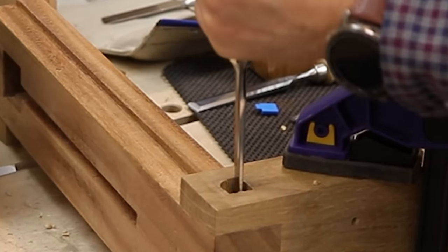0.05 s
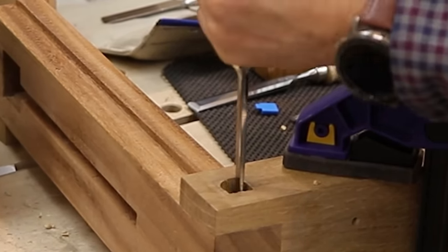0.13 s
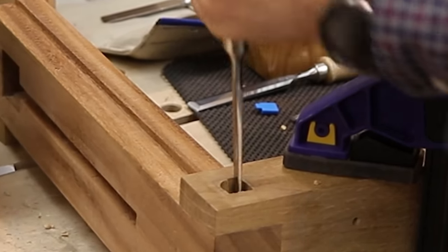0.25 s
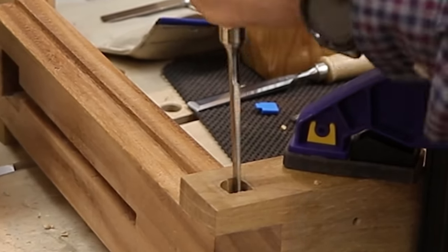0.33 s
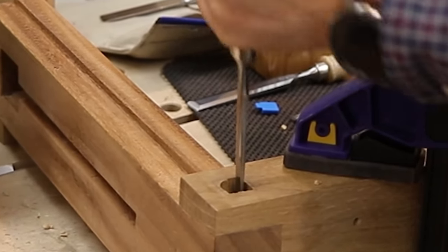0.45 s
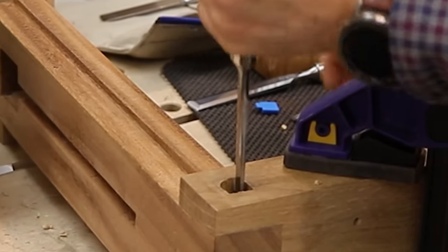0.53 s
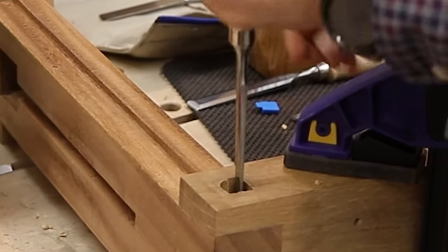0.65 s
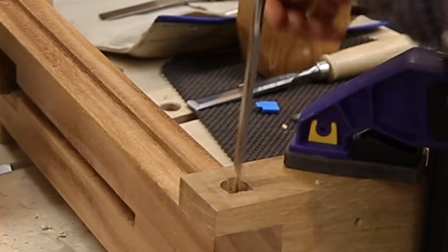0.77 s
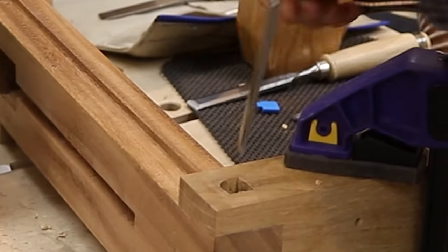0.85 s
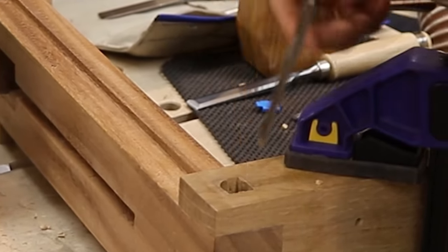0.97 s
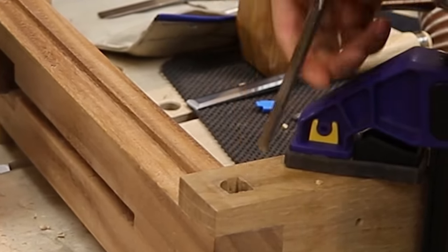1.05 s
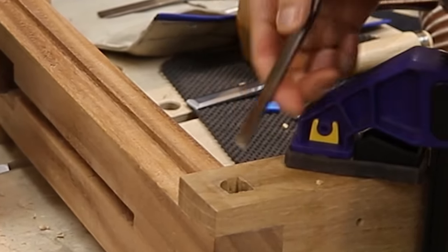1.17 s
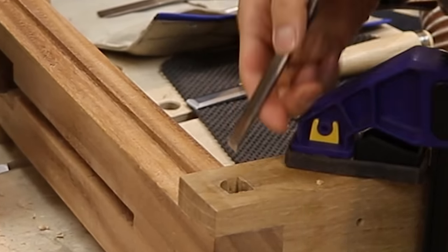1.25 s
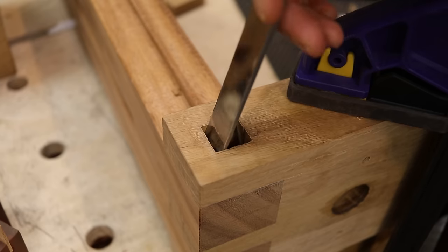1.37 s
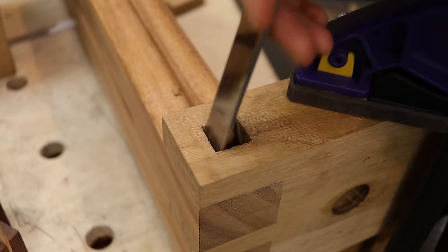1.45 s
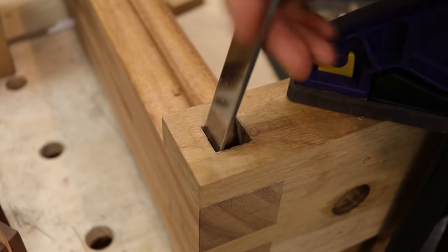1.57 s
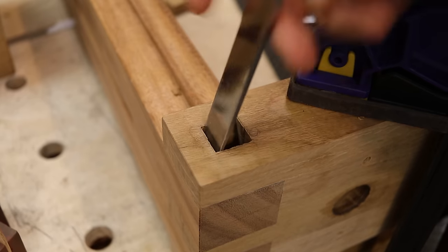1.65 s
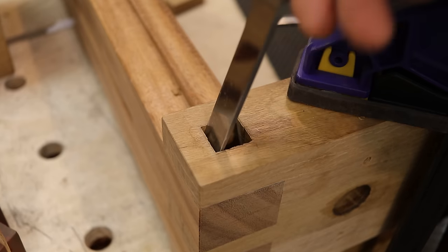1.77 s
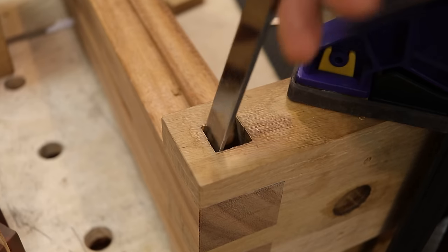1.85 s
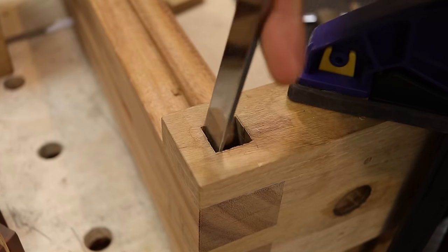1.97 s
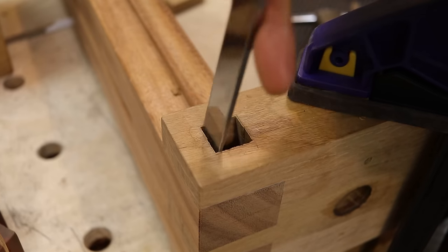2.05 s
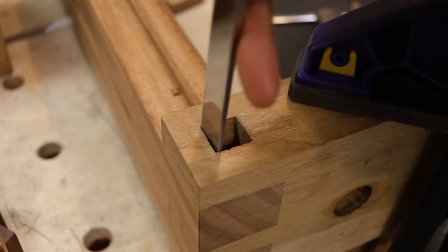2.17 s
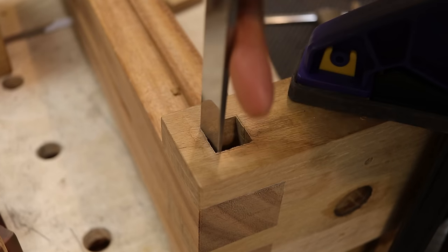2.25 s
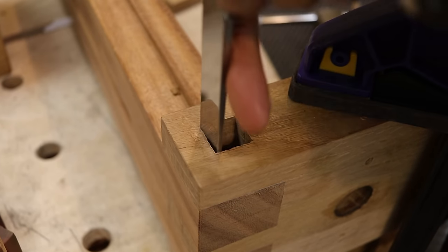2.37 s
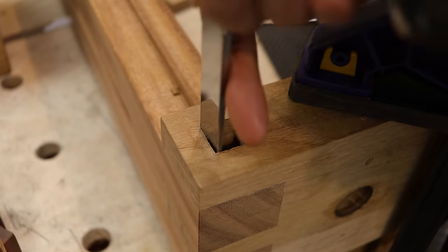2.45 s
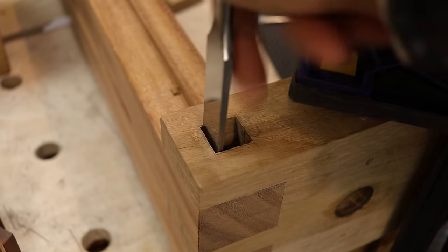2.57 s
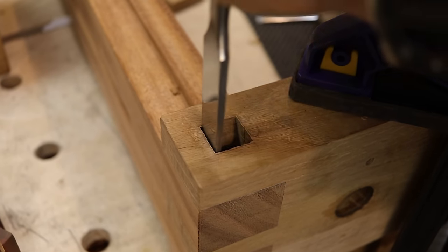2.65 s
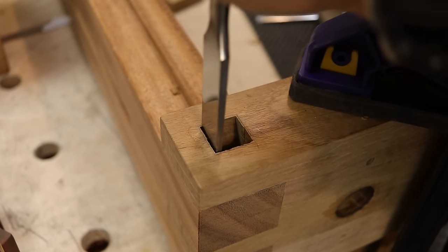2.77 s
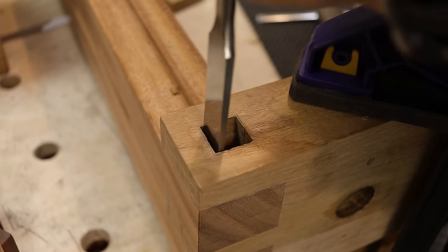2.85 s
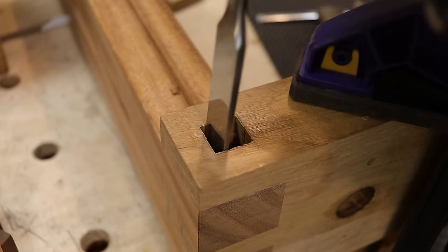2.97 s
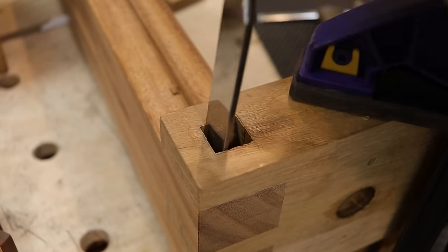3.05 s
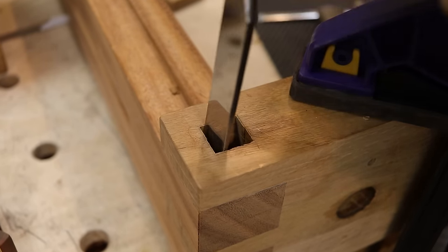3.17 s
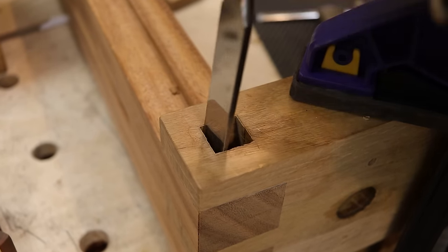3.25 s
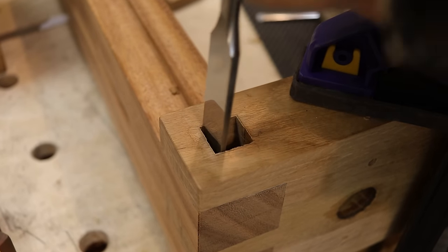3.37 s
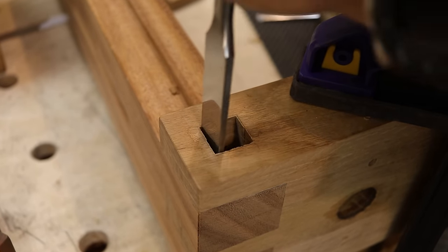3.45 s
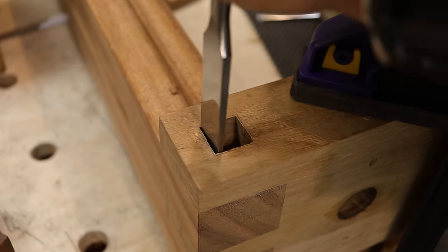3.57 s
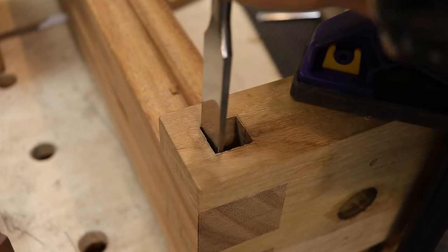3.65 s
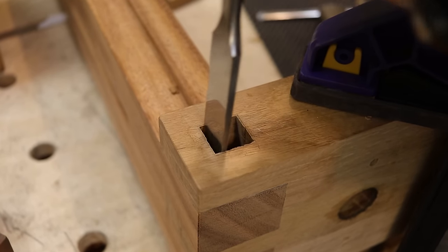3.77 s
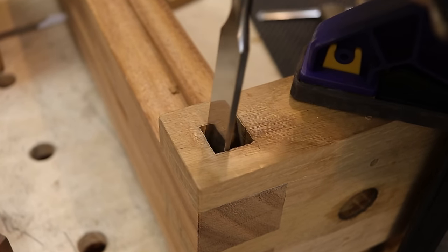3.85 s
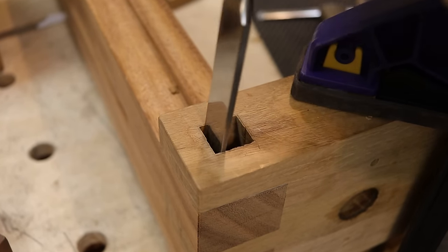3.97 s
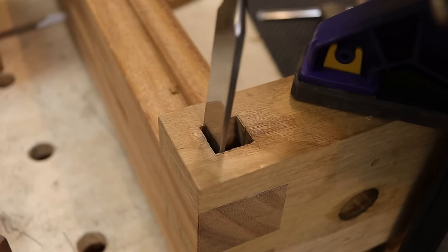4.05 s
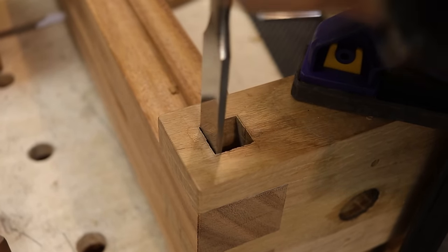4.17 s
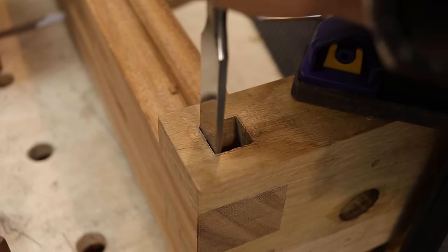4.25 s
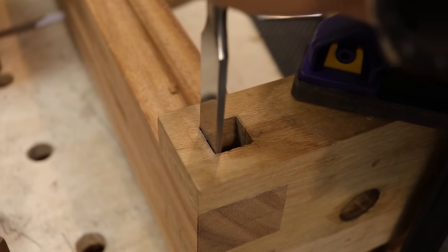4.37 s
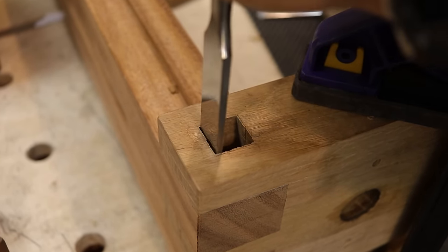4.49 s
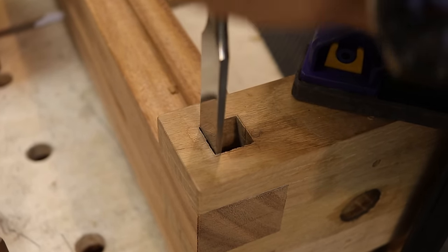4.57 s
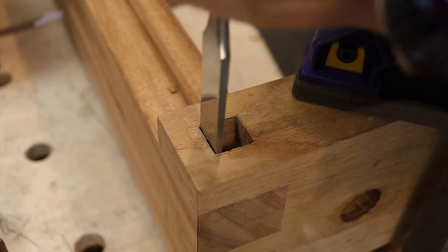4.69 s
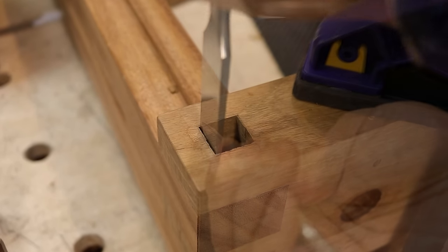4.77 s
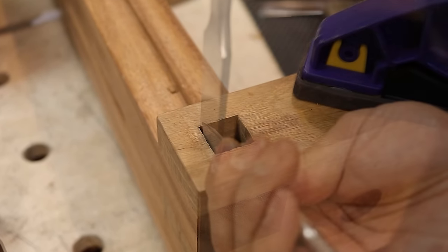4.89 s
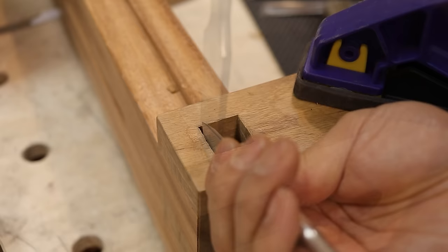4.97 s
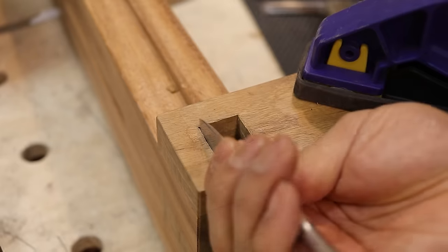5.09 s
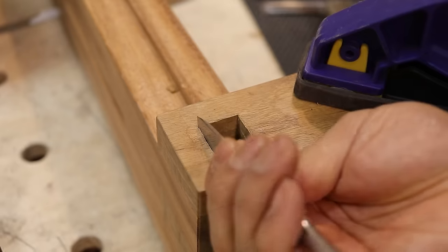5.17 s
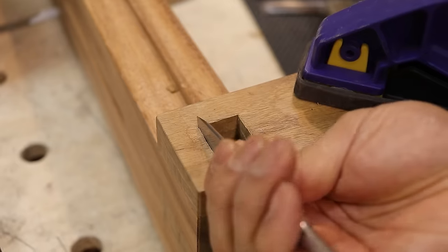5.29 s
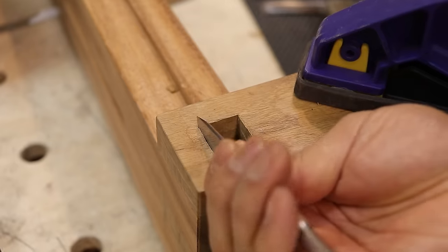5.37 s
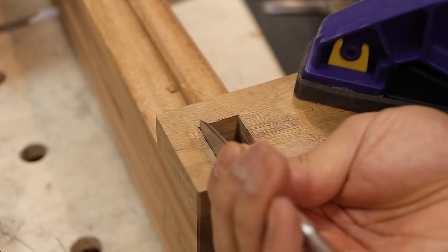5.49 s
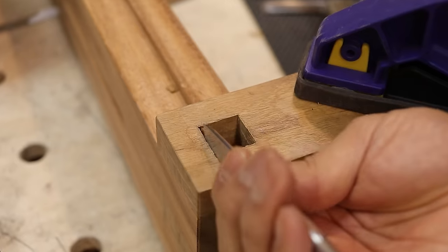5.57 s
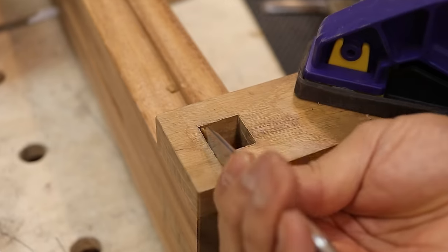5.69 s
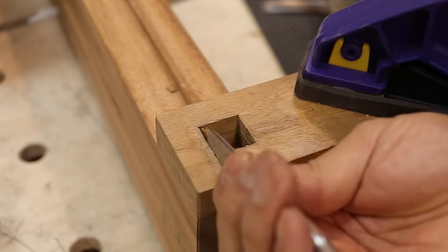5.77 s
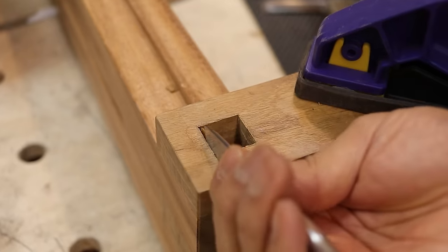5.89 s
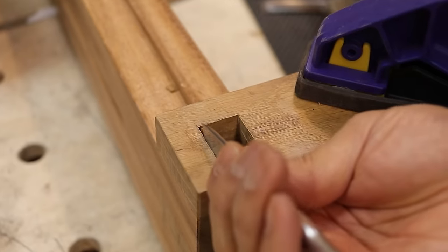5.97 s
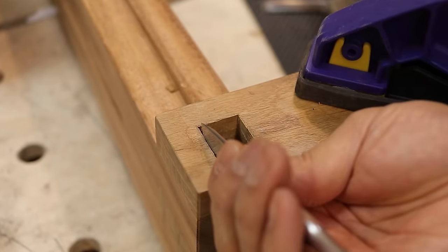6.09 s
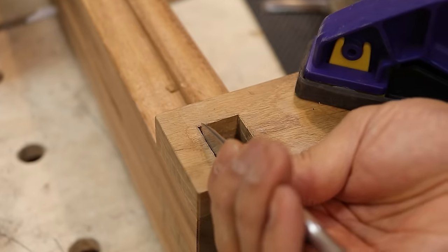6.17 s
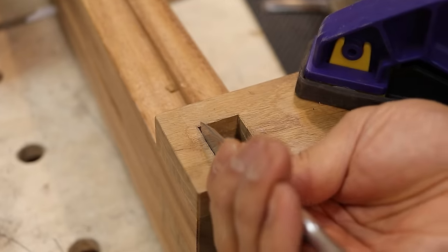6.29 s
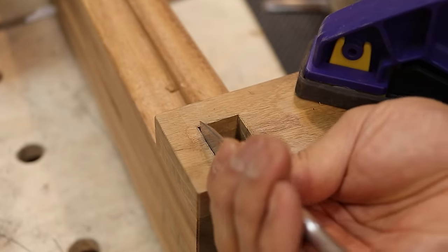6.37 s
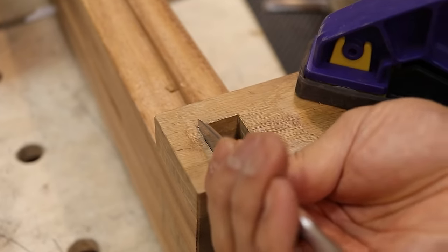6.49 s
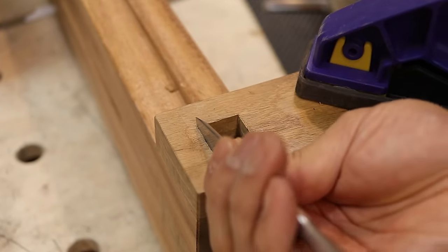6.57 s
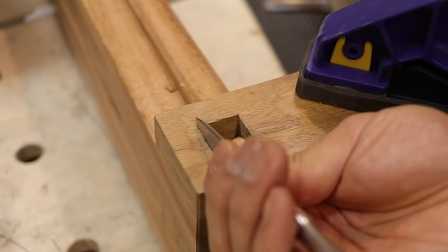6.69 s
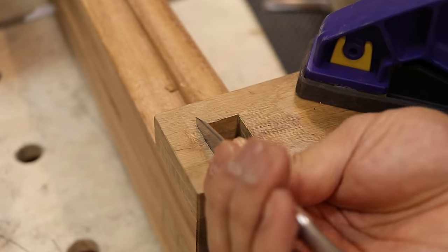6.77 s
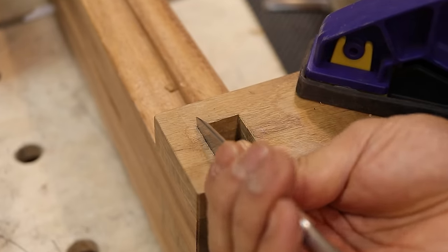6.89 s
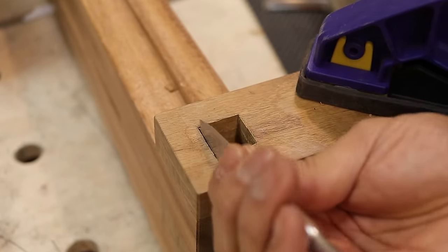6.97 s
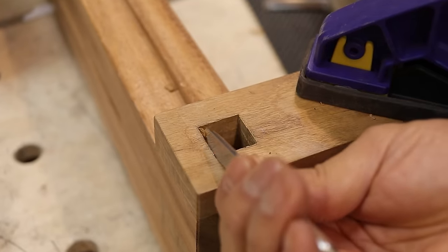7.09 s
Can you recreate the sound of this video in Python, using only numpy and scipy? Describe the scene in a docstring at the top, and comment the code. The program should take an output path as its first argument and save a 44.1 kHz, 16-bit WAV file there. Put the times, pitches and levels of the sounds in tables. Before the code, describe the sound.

In a small quiet workshop, a steel file bumps dully against a clamped oak block and rubs faintly out of its hole. After a slight step up in background hiss, a chisel is set down with a woody tap and pushed in short, dense crackles of torn fibre ending in hollow knocks. Fibres snap, a sleeve rustles near the close microphone, and light paring scrapes finish.

```python
"""A small workshop: a file bumps softly and is drawn out of a hole in a clamped oak block, then a chisel squares the corners.
Each push is a dense crackle of torn fibres, shaped by wood and blade; it ends in a knock of ringing modes that rocks the bench.
Among and after the pushes the chisel pares with its blade held flat; taps, snapping fibres and a squeak come from the hole.
A sleeve rustles in soft grains close to the microphone, over room air, hiss and low flicker noise."""
import sys
import numpy as np
from scipy import signal
from scipy.fft import rfft, irfft, next_fast_len
from scipy.io import wavfile
from scipy.ndimage import uniform_filter1d

SR = 44100
rng = np.random.default_rng(int(sys.argv[2]) if len(sys.argv) > 2 else 0)


def to_wav(sig):
    """Store sig (one row per channel, or 1-D mono) as 16-bit WAV at the path in sys.argv[1].

    Samples outside -1..1 are clipped; the rate is SR.
    """
    pcm = np.clip(np.atleast_2d(sig), -1, 1) * 32767
    pcm = np.round(pcm).astype(np.int16)
    wavfile.write(sys.argv[1], SR, pcm.T)  # frames by channels


N = 314874
TIME = np.arange(N) / SR
GRID = np.fft.rfftfreq(8192, 1 / SR) + 1  # Hz, lifted by 1 to allow logarithms

# the upright blade cuts down and stops with a knock:
# [stop_s, length_s, level_db, tilt_db_per_octave, spikiness_db, blade_ring_hz, knock_db, contact_cutoff_hz]
UPRIGHT_PUSHES = [(2.341, .028, -47.5, -.8, -1, 5900, -45.5, 450),
                  (2.424, 0.051, -43.5, -1.4, -4.5, 1370, -39, 503),
                  (2.548, .047, -36.5, -2.2, 3, 1700, -38, 480),
                  (2.674, .036, -34, -0.2, 5, 1930, -21, 570),
                  (3.509, .058, -29.5, 0.5, 6, 10800, -25, 460),
                  (3.727, .012, -44, -1.5, 9, 5400, -58.5, 336), (4.307, .015, -27, -1, -5, 5040, -23, 473),
                  (4.701, 0.02, -42, -1.3, 10, 2430, -41.5, 280)]
# paring with the blade held flat: [stop_s, length_s, level_db, tilt_db_per_octave, spikiness_db, blade_ring_hz]
FLAT_PARES = [(3.225, .17, -50.5, -6, 5.8, 1550), (3.308, .03, -59, 1.5, 5.5, 3200),
              (3.973, .075, -51, -7.5, 3.6, 246), (4.072, 0.073, -45, 0.1, 8.7, 7300),
              (5.266, .066, -32.5, .2, 4.6, 240), (5.58, 0.035, -57, -2.5, 4, 259),
              (5.73, 0.084, -57, -2, 5.4, 250), (6.16, 0.061, -61.5, -0.5, 3.8, 540),
              (6.302, 0.035, -60, -3, 5.4, 1750), (6.44, 0.097, -49.5, -2, 5.8, 225),
              (6.548, .068, -50, -1.85, 4, 1770), (6.699, .114, -38, -.3, 4.8, 1850)]
# what an upright blade in the hole rings with: [mode_hz, width_hz, relative_db]
UPRIGHT_MODES = [(211, 120, 5.5), (378, 100, 2.5), (566, 305, 1.5), (808, 240, -0.5), (1232, 183, 0.5),
                 (1713, 380, -2.5), (2210, 540, -10), (2600, 1100, -28), (3250, 1400, -7),
                 (3800, 1600, -13), (2120, 140, -8.5), (3020, 77, 3), (5180, 1500, -12), (6020, 1050, -12),
                 (7980, 2030, -12.5), (11000, 2300, -13), (14200, 3500, -21.5)]


def amp(db):
    """Decibels to gain."""
    return 10 ** (np.asarray(db) / 20)


def unit(x):
    """Scale to rms 1."""
    return x / np.sqrt(np.mean(x ** 2) + 1e-20)


def along(points, hz):
    """Read a curve of (Hz, value) points on a log frequency axis."""
    point_hz, values = np.transpose(points)
    return np.interp(np.log(hz + 1), np.log(point_hz + 1), values)


def bump(hz, octaves):
    """A bell on the log-frequency axis."""
    return np.exp(-.5 * (np.log2(GRID / hz) / octaves) ** 2)


def coloured(x, gain):
    """Causal minimum-phase filter with the given gain shape; white noise keeps its power."""
    cepstrum = irfft(np.log(np.maximum(gain / gain.max(), 1e-5)))
    half = len(cepstrum) // 2
    # folding the cepstrum forward makes the filter causal
    cepstrum[1:half] *= 2
    cepstrum[half + 1:] = 0
    kernel = irfft(np.exp(rfft(cepstrum)))[:half]
    return signal.fftconvolve(x, kernel / np.linalg.norm(kernel))


def add(track, s, x):
    """Mix x into the track at time s."""
    part = track[max(round(s * SR), 0):][:len(x)]
    part += x[:len(part)]


def burst(db, colour, t60):
    """A short contact noise that starts at once and dies away."""
    t = np.arange(SR // 4) / SR
    return coloured(rng.standard_normal(len(t)) * amp(db - 60 * t / t60), colour)


def crackle(size, spiky_db, rate, snap_s):
    """Fibres break rate times a second; each is a burst of random size that starts at once and dies away."""
    lead = SR // 50  # earlier snaps are still dying away at the start
    strength = amp(spiky_db * np.clip(rng.standard_normal(size + lead), -2, 2))
    snaps = (rng.random(size + lead) < rate / SR) * strength
    power = signal.lfilter([1], [1, -np.exp(-1 / (snap_s * SR))], snaps ** 2)[lead:]
    return unit(np.sqrt(power) * rng.standard_normal(size))


def strokes(table, modes, bite_db, rise_share, fade_db, ring_db, fibre_rate):
    """The edge bites, runs through the fibres and stops dead; wood and blade colour the crackle."""
    out = np.zeros(N)
    mode_gains = [amp(db) / (1 + (2 * (GRID - hz) / width) ** 2) for hz, width, db in modes]
    body = np.sqrt(sum(gain ** 2 for gain in mode_gains))
    for stop, length, db, tilt, spiky_db, ring_hz, *_ in table:
        progress = np.linspace(0, 1, int(length * SR))
        force = amp(db + np.interp(progress, [0, rise_share, 1], [-bite_db, 0, -fade_db]))
        colour = body * amp(tilt * np.log2(GRID) + ring_db * bump(ring_hz, octaves=0.12))
        fibres = crackle(len(force), spiky_db, fibre_rate, snap_s=0.00078)
        add(out, stop - length, coloured(force * fibres, colour))
    return out


def pushes():
    """The upright blade tears down through the oak, its crackle strengthening towards the stop."""
    return strokes(UPRIGHT_PUSHES, UPRIGHT_MODES, bite_db=14, rise_share=0.61, fade_db=-0.5,
                   ring_db=9.5, fibre_rate=2500)


def pares():
    """The blade held flat pares in strokes that rise early and then ease off."""
    # what a paring stroke rings with: [mode_hz, width_hz, relative_db]
    flat_modes = [(213, 88, 2.5), (376, 48, -5), (523, 98, -3.5), (806, 130, -9.5), (1021, 39, -6),
                  (1220, 300, -11), (1713, 167, -4.5), (2020, 520, -18.5), (3040, 210, -10.5),
                  (3224, 42, -7), (3490, 270, -14.5), (3900, 280, -21), (4760, 460, -16),
                  (5440, 540, -18.5), (6130, 630, -17.5), (8100, 3400, -29.5), (9200, 3200, -25)]
    return strokes(FLAT_PARES, flat_modes, bite_db=12, rise_share=.28, fade_db=4.5,
                   ring_db=5.5, fibre_rate=3000)


def slides():
    """The blade slides along the wall of the hole without cutting."""
    # [stop_s, length_s, level_db, tilt_db_per_octave, spikiness_db, blade_ring_hz]
    wall_slides = [(1.875, 0.11, -55.5, -2, -2, 3900), (2.097, 0.062, -55, -0.5, 3, 5370),
                   (3.05, .16, -59.5, 1, 7, 9200), (3.45, .125, -50, 0, 13, 3700),
                   (3.79, 0.072, -58, 6.5, -2, 6960), (4.207, 0.023, -55.5, -1.5, 4, 4600),
                   (4.29, 0.063, -46.5, -2.5, -2, 4630), (4.742, 0.052, -55, 2, -5, 13000)]
    return strokes(wall_slides, UPRIGHT_MODES, bite_db=8, rise_share=0.42, fade_db=4.5,
                   ring_db=6, fibre_rate=3000)


def file_rubs():
    """The file rubs the rim on its way out of the hole."""
    # [stop_s, length_s, level_db, tilt_db_per_octave, spikiness_db, file_ring_hz]
    rim_rubs = [(.735, 0.032, -67.5, 8, 4.4, 3250), (.92, .094, -60, 0, 6.5, 895)]
    # file in the hole: [mode_hz, width_hz, relative_db]
    file_modes = [(269, 72, 8), (910, 410, -4.5), (2600, 2100, -13), (3340, 610, -7.5)]
    return strokes(rim_rubs, file_modes, bite_db=6, rise_share=0.13, fade_db=8.5,
                   ring_db=1.5, fibre_rate=1500)


def squeak(jitter, overtone_db, stutter_db):
    """The edge sticks and slips once on the wall of the hole: a faint, stuttering tone with two overtones."""
    start_s, length_s, pitch_hz, level_db = 3.09, 0.16, 1554, -59
    out, size = np.zeros(N), int(length_s * SR)
    waver = unit(uniform_filter1d(rng.standard_normal(size), size=100))
    phase = 2 * np.pi * np.cumsum(pitch_hz * (1 + jitter * waver)) / SR
    tone = unit(sum(amp(overtone_db * k) * np.sin((k + 1) * phase) for k in np.arange(3)))
    grip = amp(stutter_db * unit(uniform_filter1d(rng.standard_normal(size), size=500)))
    add(out, start_s, amp(level_db) * np.hanning(size) ** .5 * unit(grip * tone))
    return out


def damped(x, edge_hz):
    """Oak swallows the top of the treble."""
    return signal.sosfilt(signal.butter(4, edge_hz, fs=SR, output="sos"), x)


def contacts():
    """Every cut ends in a knock, and tools bump the block: (s, level dB, contact cut-off Hz, blade ring dB)."""
    # a tool is set against the block: [start_s, level_db, contact_cutoff_hz, blade_ring_db]
    bumps = [(.184, -42, 175, -55), (.212, -30.5, 74.4, -65), (.494, -49, 81.5, -63), (.828, -59, 497, -11),
             (1.602, -28.5, 1050, 1.5)]
    cut_blade_db = -33  # a blade buried in wood hardly rings
    pushed = [(stop, knock_db, contact_hz, cut_blade_db)
              for stop, *_, knock_db, contact_hz in UPRIGHT_PUSHES]
    # a stroke at hard_db knocks at -23 dB; each dB lighter loses 2.97 dB of knock
    hard_db, hard_knock_db, knock_growth, pare_contact_hz = -33, -23, 2.97, 620
    pared = [(stop, hard_knock_db + knock_growth * (db - hard_db), pare_contact_hz, cut_blade_db)
             for stop, _, db, *_ in FLAT_PARES]
    return bumps + pushed + pared


def ring(modes, t, scatter_db):
    """Damped modes, at slightly new strengths for every blow."""
    hz, db, t60 = np.transpose(modes)[:, :, None]
    sign = rng.choice([-1, 1], hz.shape)
    level = amp(db + scatter_db * rng.standard_normal(hz.shape) - 60 * t / t60)
    return np.sum(sign * level * np.sin(2 * np.pi * hz * t), axis=0)


def knocks():
    """Tools strike the oak: soft contacts leave out the high modes, brief ones hardly move the low modes."""
    # oak and bench: [mode_hz, relative_db, t60_s]
    block_modes = [(146.6, 2.5, 0.24), (176.7, 0, 0.31), (196.2, 2, 0.17), (237.1, -0.5, 0.28),
                   (346.7, -3, 0.12), (383, -6, 0.12), (456, -8.5, 0.136), (532, -2, 0.14), (702, -1, 0.1),
                   (804, -7.5, 0.23), (994, -21, 0.14), (1030, -2, 0.13), (1275, -28, .12),
                   (1730, -56, 0.14)]
    # the steel blade: [mode_hz, relative_db, t60_s]
    blade_modes = [(2183, 8, 0.017), (2300, -8, 0.16), (5540, -7.5, 0.016)]
    clack_contact_hz = 814  # softer contacts than this hardly wake the hole's hollow clack
    out, t = np.zeros(N), np.arange(SR // 2) / SR
    for s, db, contact_hz, blade_db in contacts():
        bass_hz = 0.19 * contact_hz
        struck = []
        for hz, level, t60 in block_modes:
            loss_db = 10 * np.log10(1 + (hz / contact_hz) ** 4 + (bass_hz / hz) ** 4)
            struck.append((hz, level - loss_db, t60))
        wood = ring(struck, t, scatter_db=1.5)
        steel = ring(blade_modes, t, scatter_db=1)
        # the many heavily damped modes of the bench merge into a short thud
        contact = (1 + (GRID / contact_hz) ** 4 + (bass_hz / GRID) ** 4) ** -.5
        colour = contact * GRID / (GRID + 120)
        thud = coloured(rng.standard_normal(len(t)) * amp(-60 * t / 0.081), colour)[:len(t)]
        add(out, s, amp(db - 9.5) * (wood + amp(-3.5) * thud + amp(blade_db) * steel))
        softness_db = 10 * np.log10(1 + (clack_contact_hz / contact_hz) ** 6)
        add(out, s, burst(db + 1 - softness_db, bump(hz=519, octaves=0.29), t60=0.063))
    return out


def taps():
    """The tools tap the wood, from a dull thump to a sharp tick on the hole's edge."""
    # [start_s, level_db, centre_hz, width_octaves, t60_s]
    tool_taps = [(0.211, -42, 129.5, 0.2, 0.25), (1.259, -56.5, 910, 0.58, 0.062),
                 (1.603, -40, 1080, .12, 0.12), (2.626, -47.5, 1600, 1.1, 0.02),
                 (2.671, -22, 1640, 0.69, 0.018), (2.815, -54, 1490, 0.39, 0.037),
                 (2.868, -33.5, 790, .65, 0.015), (2.922, -44.5, 1180, 0.78, 0.023),
                 (3.615, -39, 2300, 0.15, 0.011), (4.012, -34.5, 1520, 0.31, 0.032),
                 (4.029, -46, 1650, 0.29, 0.019), (4.684, -54, 2440, 0.072, .05),
                 (4.692, -43, 1200, 0.38, 0.044), (5.266, -32, 970, 0.46, 0.073)]
    out = np.zeros(N)
    for s, db, hz, octaves, t60 in tool_taps:
        add(out, s, burst(db, bump(hz, octaves), t60))
    return out


def snaps():
    """Single fibres snap under the loaded edge, each a very short bright burst."""
    # [start_s, level_db]
    fibre_snaps = [(3.222, -50), (3.377, -51), (3.427, -39), (3.435, -45), (3.452, -42), (3.476, -26),
                   (3.548, -42), (4.2217, -30.5), (4.2506, -31), (4.298, -24)]
    # spectrum of one snap: [frequency_hz, relative_db_per_hz]
    snap_colour = [(500, -7), (1700, -2), (2600, -13), (3900, 5), (5500, 3), (9000, -10), (15000, -21)]
    out = np.zeros(N)
    for s, db in fibre_snaps:
        add(out, s, burst(db, amp(along(snap_colour, GRID)), t60=0.0072))
    return out


def bench():
    """Each push rocks the heavy bench twice: as the hand leans in and just after the blade stops."""
    sway_hz, sway_cycles = 43, 0.26
    lean_lead_s, lean_db, rock_lag_s = 0.0293, -7.5, 0.0031
    out, t = np.zeros(N), np.arange(-SR // 10, SR // 10) / SR
    sway = np.sin(2 * np.pi * sway_hz * t) * np.exp(-(sway_hz * t / sway_cycles) ** 2)
    for stop, *_, knock_db, _ in UPRIGHT_PUSHES:
        db = -6 + 0.49 * knock_db  # the sway grows more slowly than the knock
        add(out, stop - lean_lead_s + t[0], amp(db + lean_db) * sway)
        add(out, stop + rock_lag_s + t[0], amp(db) * sway)
    return out


def rustle(curve, gain_db):
    """Cloth and skin rub in fine soft grains as the arm moves."""
    # spectrum of the rubbing: [frequency_hz, relative_db_per_hz]
    cloth = [(24, -44), (40, 8), (202, -8), (239, -3.5), (277, -6), (391, -6), (431, -1.5), (512, -8.5),
             (1210, -10), (14000, -34)]
    level_db = np.interp(TIME, *np.transpose(curve), left=-120, right=-120)
    grains = crackle(N, spiky_db=2.5, rate=1500, snap_s=.003)
    return amp(level_db + gain_db) * coloured(grains, amp(along(cloth, GRID)))[:N]


def sleeve():
    """The sleeve rustles close to the microphone, rising and falling with the arm."""
    # level before the gain: [time_s, level_db]
    sleeve_curve = [(1.4, -66.5), (1.71, -63), (2.07, -60), (2.23, -52.5), (2.44, -58.5), (3.2, -59.5),
                    (3.58, -55.5), (3.8, -60.5), (4.1, -69.5), (4.39, -63), (5.02, -69), (5.15, -71.5),
                    (5.43, -62.5), (5.85, -83)]
    return rustle(sleeve_curve, gain_db=1.5)


def hands():
    """Fingers rub softly on the file at the start."""
    # level before the gain: [time_s, level_db]
    hand_curve = [(0.0, -67), (0.7, -74.5), (0.868, -71), (1.006, -64.5), (1.29, -70), (1.4, -73)]
    return rustle(hand_curve, gain_db=-2)


def room(x, wet_db):
    """The shop's short reverberation: decaying noise, drawn anew for every half second of sound."""
    # decay of the shop: [frequency_hz, t60_s]
    decay = [(150, 0.51), (600, 0.33), (3000, 0.18), (12000, 0.14)]
    out, size = np.zeros(N), SR // 2
    for start in range(0, N, size):
        hz, t, z = signal.stft(rng.standard_normal(size), SR, nperseg=256)
        fading = z * amp(-60 * t / along(decay, hz)[:, None])
        tail = signal.istft(fading, SR, nperseg=256)[1]
        tail *= 1 - np.exp(-np.arange(len(tail)) / SR / 0.0019)  # reflections build up
        kernel = unit(tail) / np.sqrt(len(tail))
        add(out, start / SR, signal.fftconvolve(x[start:start + size], kernel))
    return x + amp(wet_db) * out


def floor(air_db, hiss_db, flicker_db, early_db):
    """Still room air in the middle, hiss and low flicker noise in each channel; all step up at 1.415 s."""
    # spectrum of the room air: [frequency_hz, relative_db_per_hz]
    air_colour = [(15, -50.5), (25, -1.5), (75, -5), (119, -1), (297, -6), (410, -10), (648, -10.5),
                  (1080, -14), (1410, -16), (2300, -15.5), (15500, -30)]
    step_s = 1.415
    air = coloured(rng.standard_normal(N), amp(along(air_colour, GRID)))[:N]
    flicker = np.array([coloured(noise, (GRID + 30) ** -.5)[:N] for noise in rng.standard_normal((2, N))])
    electronic = amp(hiss_db) * rng.standard_normal((2, N)) + amp(flicker_db) * flicker
    return amp(early_db * (TIME < step_s)) * (amp(air_db) * air + electronic)


def scene():
    """All the work reaches one microphone; only the hiss and flicker differ between the channels."""
    cutting = pushes() + pares() + slides() + file_rubs()
    cutting += squeak(jitter=0.05, overtone_db=-4.5, stutter_db=6)
    cuts = room(damped(cutting, edge_hz=10660), wet_db=-10)
    blows = room(knocks(), wet_db=-10.5)
    blows += room(taps() + snaps(), wet_db=-20.5)
    blows += room(bench(), wet_db=-14)
    arm = sleeve() + hands()
    return cuts + blows + arm + floor(air_db=-70.5, hiss_db=-66.0, flicker_db=-72, early_db=-3.5)


def record(dry):
    """Nothing is kept above the band limit."""
    top_hz = 15830
    size = next_fast_len(N + SR // 2)
    kept = np.fft.rfftfreq(size, 1 / SR) < top_hz
    return irfft(rfft(dry, size) * kept, size)[:, :N]


dry = scene()
out = record(dry)
to_wav(out)
```